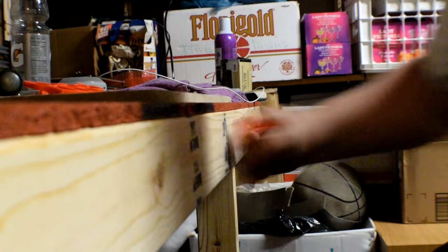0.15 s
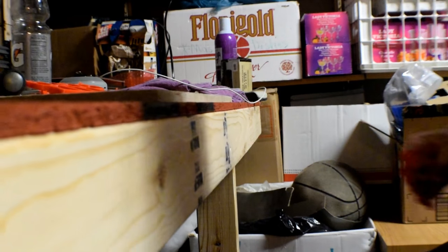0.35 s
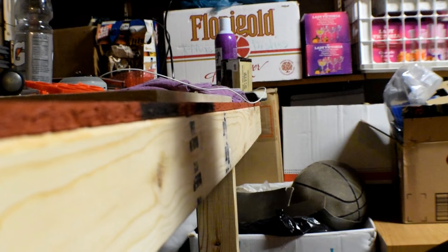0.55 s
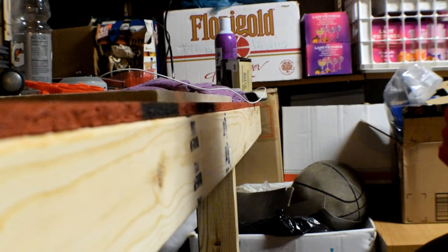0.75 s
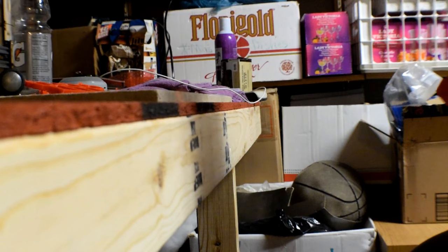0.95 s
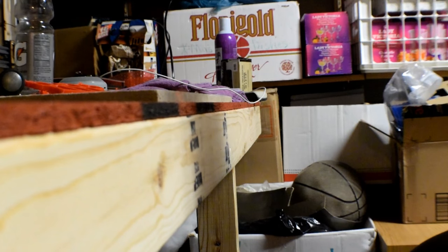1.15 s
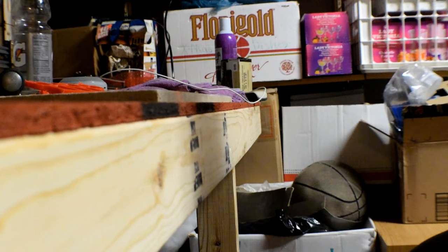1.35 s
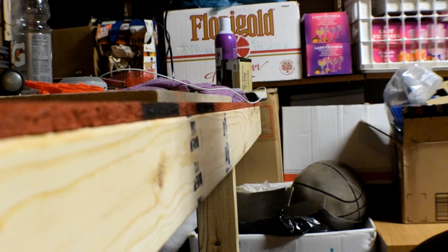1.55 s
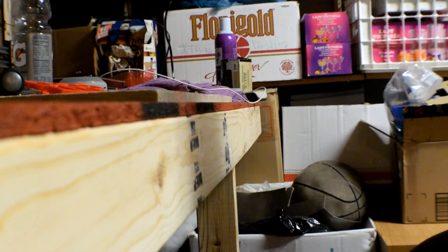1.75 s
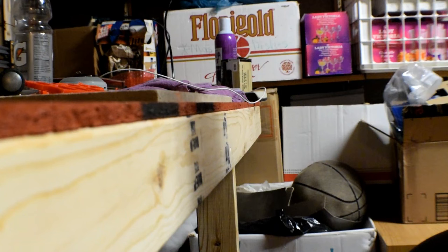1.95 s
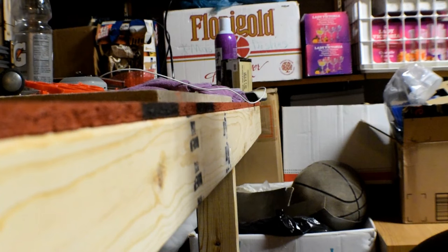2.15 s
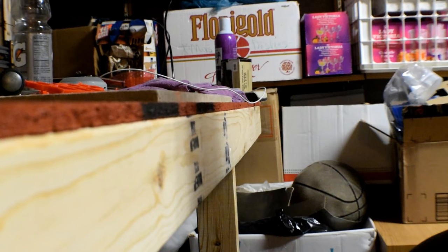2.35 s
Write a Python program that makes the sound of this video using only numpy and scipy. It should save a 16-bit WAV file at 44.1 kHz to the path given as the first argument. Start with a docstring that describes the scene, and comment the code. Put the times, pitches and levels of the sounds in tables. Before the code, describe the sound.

A fist slams a wooden board after a brief rustle of clothes, loud enough to overload the microphone. The wooden frame rocks and knocks, something bumps close by, and a small object bounces to rest in a small storage room.

```python
"""Clothes rustle over low room noise, then a fist slams a wooden board on a frame in a small storage room.
The board cracks and rings, the frame thuds, the room answers and the microphone overloads.
The frame rocks and knocks several times and its strained joints tick. Something bumps dully close by,
and further off a small loose object bounces to rest while a low rumble dies down."""
import sys
import numpy as np
from scipy import signal
from scipy.fft import rfft, irfft
from scipy.io import wavfile
from scipy.ndimage import uniform_filter1d

SR = 44100
rng = np.random.default_rng(int(sys.argv[2]) if len(sys.argv) > 2 else 0)


def put_to_file(sound):
    """Save the sound as 16-bit audio at rate SR, in the file named by the first command-line argument."""
    columns = np.atleast_2d(sound).T  # one column per channel
    safe = np.clip(columns, -1, 1)
    whole_steps = np.round(safe * 32767)
    wavfile.write(sys.argv[1], SR, whole_steps.astype(np.int16))


N = 105840
T = np.arange(N) / SR
BINS_HZ = np.fft.rfftfreq(N, 1 / SR)


def undb(db):
    """Decibels to gain."""
    return 10 ** (np.asarray(db) / 20)


def unit(x):
    """Scale to rms 1."""
    return x / np.sqrt(np.mean(x ** 2))


def sine(pitch_hz):
    """Sine of peak 1."""
    return np.sin(2 * np.pi * pitch_hz * T)


def rise(attack_s):
    """Exponential onset."""
    return 1 - np.exp(-T / attack_s)


def fade(t60_s):
    """Exponential decay, 60 dB in t60_s."""
    return np.exp(-np.log(1000) * T / t60_s)


def at(x, start_s):
    """Delay x to start_s."""
    return np.concatenate([np.zeros(int(start_s * SR)), x])[:N]


def over_bins(freqs_hz, values):
    """Interpolate onto the FFT bins, in log frequency."""
    return np.interp(np.log(np.maximum(BINS_HZ, 1)), np.log(freqs_hz), values)


def noise(colour):
    """Noise of rms 1, shaped by rows of freq_hz, density_db."""
    freqs_hz, density_db = np.transpose(colour)[:2]
    white = rfft(rng.standard_normal(N))
    return unit(irfft(white * undb(over_bins(freqs_hz, density_db)), N))


def ring(modes, detune):
    """Decaying modes, with random polarity and slight detuning per strike."""
    out = 0
    for pitch_hz, level_db, t60_s in modes:
        offset, polarity = rng.standard_normal(2)
        out += undb(level_db) * fade(t60_s) * np.sign(polarity) * sine(pitch_hz * (1 + detune * offset))
    return out


# Room noise spectrum: freq_hz, density_db
AIR_COLOUR = [(22, -23), (42, -8), (58, 1), (85, -7), (140, -6), (300, -5), (500, -9), (800, -14.5),
              (1800, -27), (3000, -35.5), (6000, -42.5), (10000, -50.5), (16000, -63)]
# Hum tones: pitch_hz, rms_db
HUM_TONES = [(59.2, -59), (350, -60.5), (1809, -70)]


def background():
    """Low room noise with a faint steady hum."""
    hum = sum(np.sqrt(2) * undb(rms_db) * sine(pitch_hz) for pitch_hz, rms_db in HUM_TONES)
    return undb(-44) * noise(AIR_COLOUR) + hum


# Rumble envelope: time_s, level_db
RUMBLE_LEVELS = [(.3, -50), (.55, -37), (.74, -40.5), (.85, -40), (1.05, -49.5), (1.3, -45), (1.6, -52.5)]
# Rumble spectrum: freq_hz, density_db
RUMBLE_COLOUR = [(30, -17.5), (90, 0), (180, 1.5), (400, -5), (750, -13.5), (1500, -34.5), (5000, -60)]


def settling():
    """Low rumble swells after the slam and sinks as everything settles."""
    level_db = np.interp(T, *np.transpose(RUMBLE_LEVELS))
    return noise(RUMBLE_COLOUR) * undb(level_db)


# Rustle envelope: time_s, level_db
CLOTH_LEVELS = [(0, -46.5), (.05, -44.5), (.11, -51.5), (.2, -53.5), (.55, -50), (.85, -60), (1.0, -64),
                (1.3, -71), (2.4, -82)]
# Rustle spectrum: freq_hz, density_db
CLOTH_COLOUR = [(200, -26), (700, 5), (2200, 4), (4000, -5.5), (8000, -13), (12000, -21), (16000, -46)]


def clothes():
    """Cloth rustles through the swing, then settles."""
    flutter_db = 0.5 * unit(uniform_filter1d(rng.standard_normal(N), size=700))
    level_db = np.interp(T, *np.transpose(CLOTH_LEVELS))
    return noise(CLOTH_COLOUR) * undb(level_db + flutter_db)


# Bounces: start_s, level_db
OBJECT_BOUNCES = [(0.524, -32), (0.542, -37.5), (0.64, -41.5), (.757, -43), (0.766, -43.5), (0.918, -40),
                  (1.183, -45), (1.1956, -39.5), (1.345, -43), (1.462, -57), (1.474, -42.5), (1.5495, -44),
                  (1.6223, -47), (1.664, -49.5), (1.726, -52.5), (1.757, -52.5), (1.8156, -52),
                  (1.880, -55.5)]
# Object modes: pitch_hz, level_db, t60_s
OBJECT_MODES = [(1130, 4.5, 0.17), (1271, 1.5, 0.28), (1392, 8.5, 0.1), (1638, 1, 0.15), (1847, 1, 0.17),
                (1996, -4, 0.15), (2380, -5.5, 0.15), (2940, -14, 0.3), (3520, -5.5, 0.067)]
# Hard contact spectrum: freq_hz, density_db
CLACK_COLOUR = [(300, 3.5), (800, 9), (1400, 0), (2500, -1), (3600, -13.5), (6000, -28), (14000, -56)]


def loose_object():
    """A small hard object bounces to rest: each contact clacks, rings and raises the same room echo."""
    echo = undb(-1.5) * noise(CLACK_COLOUR) * fade(t60_s=0.19) * rise(attack_s=0.004)
    out = 0
    for start_s, level_db in OBJECT_BOUNCES:
        contact = undb(0.5) * noise(CLACK_COLOUR) * fade(t60_s=0.04)
        ringing = undb(-9.5) * ring(OBJECT_MODES, detune=0.0072)
        clack = (contact + echo + ringing) * rise(attack_s=0.00078)
        out += undb(level_db) * at(clack, start_s)
    return out


# Close bumps: start_s, level_db, pitch_hz, length_s
BUMP_HITS = [(0.6589, -19, 179.2, 0.015), (1.013, -35.5, 321, 0.014)]
# Bump roughness spectrum: freq_hz, density_db
ROUGH_COLOUR = [(100, -2), (350, 3), (600, -11), (900, -16), (2500, -31), (6000, -66), (16000, -69)]


def bumps():
    """Dull bumps, close and dry: a soft click and a few rough low cycles that stop short."""
    edge_s, overtone_ratio = 0.004, 2.03
    out = 0
    for start_s, level_db, pitch_hz, length_s in BUMP_HITS:
        gate = np.clip(np.minimum(T, length_s + edge_s - T) / edge_s, 0, 1)
        tone = sine(pitch_hz) + undb(-10) * sine(overtone_ratio * pitch_hz)
        body = tone + undb(-9) * noise(ROUGH_COLOUR)
        click = undb(-8.5) * noise(CLACK_COLOUR) * fade(t60_s=0.018) * rise(attack_s=0.00068)
        out += undb(level_db) * at(click - gate * body, start_s)
    return out


# Joint ticks: start_s, level_db, t60_s
JOINT_TICKS = [(0.2321, -12.5, 0.1), (0.2539, -16.5, .09), (.3155, -30, .015), (.3775, -29.5, 0.1),
               (0.4345, -35, 0.018), (0.5264, -24.5, 0.018), (0.5574, -32.5, 0.015), (0.696, -46, 0.027),
               (0.742, -51, .008), (0.766, -37.5, 0.015), (.843, -43.5, 0.033), (0.8973, -48, 0.014)]
# Tick spectrum: freq_hz, density_db
TICK_COLOUR = [(600, 10.5), (2000, 6), (4500, -4.5), (8000, -9), (11000, -18), (16000, -37)]


def joints():
    """Strained joints snap and tick brightly, with a faint room tail."""
    tail = undb(-15) * fade(t60_s=0.2)
    out = 0
    for start_s, level_db, t60_s in JOINT_TICKS:
        envelope = rise(attack_s=0.00017) * (fade(t60_s) + tail)
        out += undb(level_db) * at(noise(TICK_COLOUR) * envelope, start_s)
    return out


def air_push():
    """One slow cycle of air pressure as the board gives."""
    period_s = 0.021
    cycle = sine(1 / period_s) * (T < period_s)
    return undb(-25.5) * at(cycle, start_s=0.28)


# Room response: freq_hz, density_db, t60_s
ROOM_BANDS = [(35.5, -55, 0.25), (97, 4, 0.72), (252, 7.5, 0.31), (630, 5, 0.32), (1180, -5.5, 0.63),
              (2240, -12.5, 0.53), (5400, -20, 0.32), (9100, -20.5, 0.22), (16000, -35, .28)]


def room_tail():
    """Dense reflections build quickly; each band decays at its own rate."""
    spectrum = rfft(noise(ROOM_BANDS))
    centres_hz, _, t60s_s = np.transpose(ROOM_BANDS)
    out = 0
    for selector, t60_s in zip(np.eye(len(ROOM_BANDS)), t60s_s):
        band = irfft(spectrum * over_bins(centres_hz, selector), N)
        out += band * fade(t60_s)
    return out * rise(attack_s=0.0078)


# Slam, then knocks: start_s, level_db, cutoff_hz, crack_db, thud_hz, thud_db, thud_t60_s
BOARD_BLOWS = [(0.2251, 7, 7100, 1.5, 166.5, -7.5, 0.2), (.2535, -12.5, 3500, 1, 331, 8.5, 0.17),
               (0.341, -16, 1200, -26, 203.5, -4, 0.15), (.3635, -9, 2430, -2.5, 239, 3, 0.095),
               (.391, -21, 1500, -3, 592, -1, 0.16), (0.411, -18, 3020, -5.5, 102, -2.5, 0.21),
               (0.5192, -24.5, 2550, -4.5, 378, -2.5, 0.11)]
# Board and frame modes: pitch_hz, level_db, t60_s
BOARD_MODES = [(97.3, -10.5, 0.79), (153.8, -1, 0.17), (173.7, -1.5, 0.29), (252.2, -1.5, 0.39),
               (312, -2, .45), (344.8, -12, 0.57), (441.7, -5, 0.33), (455.3, -11, 0.45), (507, 1.5, 0.32),
               (589.6, -11.5, 0.23), (633.8, -13.5, 0.44), (759.5, -11, 0.28), (893.5, -9, .42),
               (950, -24.5, 0.31), (1057, 2.5, 0.13), (1235, -6.5, 0.32)]
# Contact crack spectrum: freq_hz, density_db
CRACK_COLOUR = [(40, -6), (170, -13.5), (400, 5.5), (900, 0), (2000, -16.5), (5000, -22.5), (10000, -35.5),
                (16000, -37)]


def board():
    """Each blow cracks, thuds the frame, rings the board and fills the room; soft contacts are duller."""
    out = 0
    for start_s, level_db, cutoff_hz, crack_db, thud_hz, thud_db, thud_t60_s in BOARD_BLOWS:
        crack = undb(crack_db - 2) * noise(CRACK_COLOUR) * fade(t60_s=0.087)
        thud = undb(thud_db) * sine(thud_hz) * fade(thud_t60_s)
        ringing = undb(-16) * ring(BOARD_MODES, detune=0.00383)
        reflections = undb(-12) * room_tail()
        lowpass = signal.butter(1, cutoff_hz, fs=SR)
        blow = signal.lfilter(*lowpass, crack + thud + ringing + reflections)
        out += undb(level_db) * at(blow, start_s)
    return out


def scene():
    """All sources at one microphone."""
    slam = board() + air_push() + joints()
    return (slam + loose_object() + bumps() + clothes() + settling() + background())[None]


def record(dry):
    """Microphone overload flattens the slam (soft clip, 2x oversampled); a low-pass cuts the top."""
    ceiling, knee, top_hz = 0.39, 12, 16500
    drive = signal.resample_poly(dry, 2, 1, axis=1) / ceiling
    clipped = ceiling * drive / (1 + np.abs(drive) ** knee) ** (1 / knee)
    lowpass = signal.ellip(8, 0.2, 80, top_hz, fs=SR, output="sos")
    return signal.sosfiltfilt(lowpass, signal.resample_poly(clipped, 1, 2, axis=1))


dry = scene()
out = record(dry)
put_to_file(out)
```